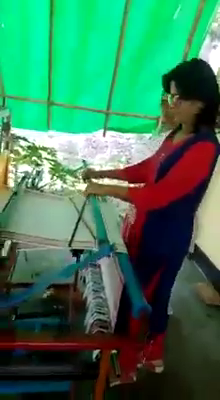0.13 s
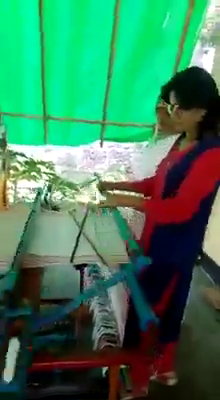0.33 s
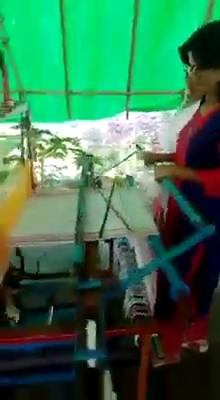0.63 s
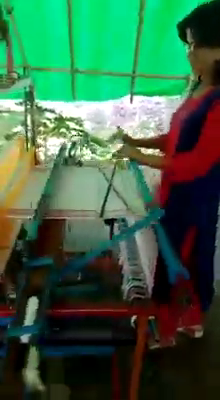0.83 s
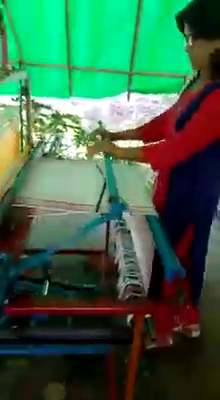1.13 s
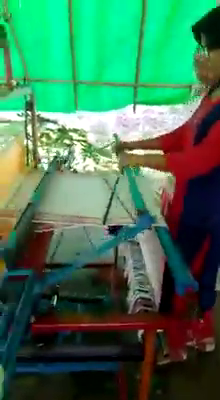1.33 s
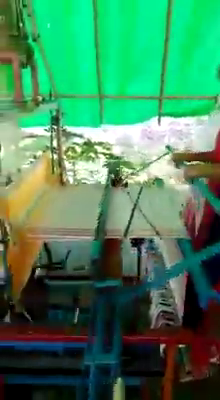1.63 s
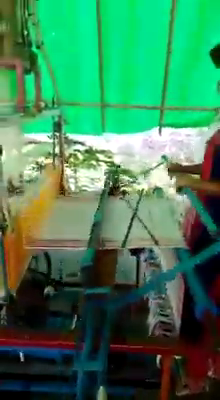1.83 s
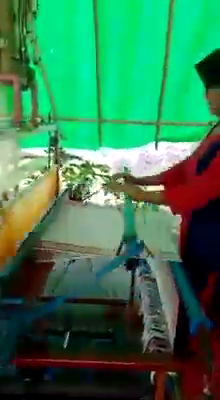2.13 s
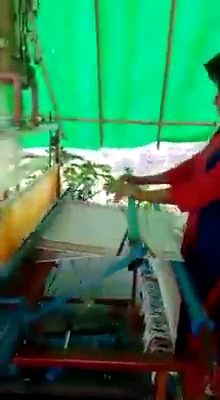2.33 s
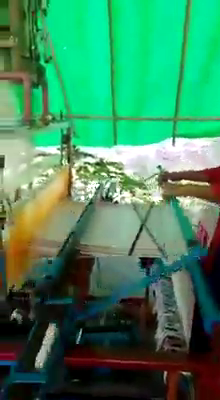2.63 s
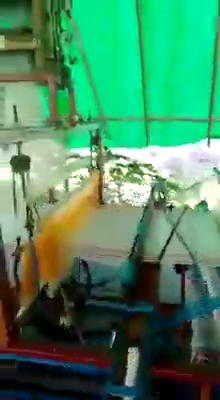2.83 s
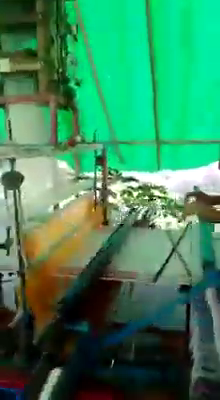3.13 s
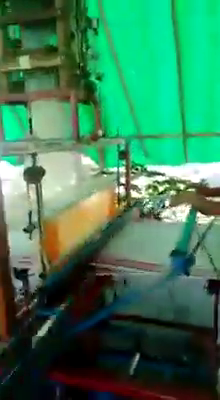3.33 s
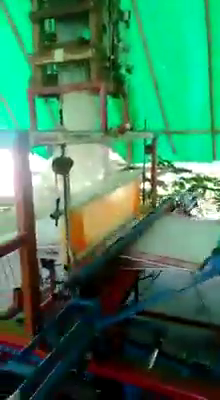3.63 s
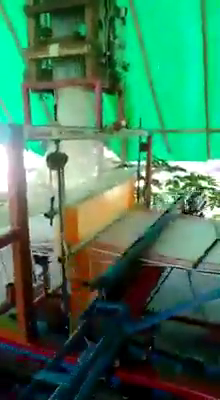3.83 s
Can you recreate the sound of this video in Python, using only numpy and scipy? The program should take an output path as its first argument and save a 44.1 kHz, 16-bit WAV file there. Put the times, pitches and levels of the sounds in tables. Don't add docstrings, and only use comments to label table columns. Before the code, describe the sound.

Hand loom rattling in bursts, bright metallic jingle over woody clatter, single clacks between strokes, densest again near the end; short covered-yard echo, quiet background, close stereo handheld microphone with slightly gritty, gated sound.

```python
import sys
import numpy as np
from scipy import signal
from scipy.fft import rfft, irfft
from scipy.io import wavfile
from scipy.ndimage import uniform_filter1d

SR = 44100
rng = np.random.default_rng(int(sys.argv[2]) if len(sys.argv) > 2 else 0)


def to_wav(sig):
    pcm = np.clip(np.atleast_2d(sig), -1, 1) * 32767
    pcm = np.round(pcm).astype(np.int16)
    wavfile.write(sys.argv[1], SR, pcm.T)


def ratio_of_db(decibels):
    return 10 ** (np.asarray(decibels, float) / 20)


N = 176400

ROD_PITCHES = [14815, 14815, 12188, 13313]


def evened(x):
    return x / np.sqrt(np.mean(x ** 2) + 1e-20)


def read(points, hz):
    f, value = np.transpose(points)
    return np.interp(np.log(hz + 1), np.log(f + 1), value)


def shape(start, rise, hold, t60):
    t = np.arange(0, N, 8) / SR - start
    attack = np.clip(t / rise, 0, 1) ** 2
    release = ratio_of_db(-120 * np.clip(t - rise - hold, 0, 3) / t60)
    return np.repeat(attack * release, 8)[:N]


def ports(pair, points):
    # pitch in Hz, share in common from 0 to 1.
    likeness = [(60, 1), (500, 0.66), (3000, 0.28), (15000, 0.07)]
    # pitch in Hz, left minus right in dB.
    balance = [(60, -2), (240, 0.5), (950, 0.5), (3770, -1.0), (15000, 1.5)]
    hz = np.fft.rfftfreq(N, 1 / SR)
    below = np.maximum(np.log2(points[0][0] / (hz + 1)), 0)
    above = np.maximum(np.log2((hz + 1) / points[-1][0]), 0)
    a, b = rfft(pair) * ratio_of_db(read(points, hz) - 60 * (below + above))
    same = np.clip(read(likeness, hz), 0, 1)
    lean = ratio_of_db(read(balance, hz) / 2)
    left = a * lean
    right = (same * a + np.sqrt(1 - same ** 2) * b) / lean
    return evened(irfft(np.array([left, right]), N))


def wander(width_hz):
    r = np.exp(-np.pi * width_hz / SR)
    noise = rng.standard_normal((2, N, 2)) @ [1, 1j]
    a, b = signal.lfilter([1], [1, -2 * r, r * r], noise)
    return np.array([a, 0.84 * a + 0.5 * b])


def fuzzy(hz, slow):
    moved = np.roll(slow, rng.integers(N), axis=1)
    return evened((moved * np.exp(2j * np.pi * hz * np.arange(N) / SR)).real)


def smooth(grid, bins, frames):
    return uniform_filter1d(uniform_filter1d(grid, bins, axis=0), frames, axis=1)


def rattle(points, per_s, spread_db, ring_s):
    size = ratio_of_db(spread_db * np.minimum(rng.exponential(1, (2, N)), 4))
    size = size * (rng.random((2, N)) < per_s / SR)
    piece = rng.integers(0, 12, (2, N))
    t = np.arange(2048) / SR
    out = np.zeros((2, N))
    for k, noise in enumerate(rng.standard_normal((12, 2048))):
        longer = 0.21 + k / 8
        ring = noise * ratio_of_db(-60 * t / (ring_s * longer)) / np.sqrt(longer)
        out += signal.oaconvolve(size * (piece == k), ring[None], axes=1)[:, :N]
    lump_s, lump_db = 0.012, -0.62
    lumps = uniform_filter1d(rng.standard_normal(N // 64 + 1), int(lump_s * SR / 64))
    return ports(out, points) * ratio_of_db(lump_db * np.repeat(evened(lumps), 64)[:N])


def loom():
    # start in seconds, hold in seconds, level of wires, plates and frame in dB.
    strokes = [(-.01, 0.046, -20, -37.5, -72), (0.016, 0.06, -19.5, -32.5, -50),
               (0.119, 0.12, -17, -26.5, -34), (0.292, 0.11, -17, -29, -40), (0.467, 0.082, -32, -33, -56),
               (1.161, 0.14, -21, -27.5, -55), (1.316, 0.1, -15, -22, -31),
               (1.475, 0.086, -29.5, -40, -45.5), (1.725, 0.041, -37.5, -73, -73),
               (1.947, 0.069, -53.5, -72, -69.5), (2.234, 0.018, -28.5, -42, -61),
               (2.262, 0.069, -24, -39.5, -77), (2.343, 0.081, -15.5, -28.5, -38),
               (2.45, 0.17, -17.5, -26, -29.5), (2.849, 0.022, -33, -38, -43),
               (3.086, 0.031, -41.5, -53, -66), (3.241, 0.032, -45, -72, -80), (3.328, 0.11, -26, -48, -85),
               (3.399, 0.12, -17.5, -25, -44), (3.47, 0.16, -21.5, -32.5, -35),
               (3.644, 0.098, -16, -25, -29), (3.795, 0.072, -25.5, -33, -61)]
    # start in seconds, wires in dB, plates above wires in dB, fade t60 in seconds.
    clacks = [(0.618, -21, -26, 0.27), (0.873, -40, -13.5, 0.16), (1.081, -49, -12, 0.17),
              (1.131, -43, -20, 0.2), (1.191, -17.5, -17.5, 0.37), (2.1331, -45.5, -25.5, 0.12),
              (2.5044, -19.5, -53, 0.54), (2.7134, -16, -9.5, 0.37), (2.9268, -19, -15.5, 0.11),
              (2.964, -22.5, -17.5, 0.14), (3.3034, -28.5, -51, 0.44), (3.7074, -20, -16, 0.1),
              (0.147, -23, -12, 0.23), (0.171, -16, -11, .12), (0.317, -21, -20, 0.17),
              (1.054, -48, -14, 0.093), (1.329, -18.5, -9.5, .2), (1.413, -28, -18, .15),
              (1.557, -20, -11.5, 0.3), (1.748, -34.5, -8.5, 0.13), (2.004, -55, -16, 0.11),
              (2.374, -32, -9, .15), (2.4, -16.5, -8.5, 0.18), (3.423, -16.5, -28, 0.18),
              (3.6565, -17.5, -4, 0.24), (3.816, -18.5, -19, 0.092), (3.833, -27, -9, 0.073),
              (3.889, -28, -1.5, 0.17)]
    # pitch in Hz, level in dB.
    wires = [(4700, -6.5), (5900, -6), (7100, 1), (8150, -2.5), (10500, 6), (12500, 0), (15300, -4.5)]
    # pitch in Hz, level in dB.
    plates = [(1030, -19.5), (1750, -12.5), (2150, 0.5), (2830, 1.5), (3970, -0.5), (4490, 2.5),
              (4700, -0.5), (6110, -10), (10300, -120)]
    # pitch in Hz, level in dB.
    frame = [(24, -47), (40, -5), (91, -18.5), (230, -15.5), (422, 2), (1010, 5), (1120, -1), (1240, 5.5),
             (1750, 2), (2280, -12), (3850, -120)]
    # knocks per second, size spread in dB, ring of a knock in seconds,
    # fade t60 after a stroke in seconds.
    parts = [
        (4830, 3.43, 0.0046, 0.38),
        (2912, 2.4, 0.0059, 0.71),
        (1189, 4.57, 0.042, 0.17),
    ]
    out = np.zeros((2, N))
    for k, (points, part) in enumerate(zip((wires, plates, frame), parts)):
        per_s, spread_db, ring_s, t60 = part
        power = np.zeros(N)
        for row in strokes:
            power += ratio_of_db(2 * row[2 + k]) * shape(row[0], 0.027, row[1], t60)
        for start, db, plates_db, fade in clacks:
            part_db = db + (0, plates_db, plates_db - 10)[k]
            power += ratio_of_db(2 * part_db) * shape(start, 0.002, 0.0068, fade)
        out += np.sqrt(power) * rattle(points, per_s, spread_db, ring_s)
    return out


def creaks():
    # start in seconds, length in seconds, pitch in Hz, level in dB.
    slips = [(0.535, 0.089, 524, -48.5), (0.775, 0.079, 315, -59), (0.811, 0.15, 1160, -57),
             (0.828, 0.088, 920, -58), (1.017, 0.074, 324, -58.5), (1.067, 0.14, 826, -50),
             (1.076, 0.35, 1685, -51), (1.541, 0.087, 663.2, -35.5), (1.556, 0.069, 479.6, -41.5),
             (1.857, 0.044, 1166, -53.5), (.0, 0.093, 789, -37.5), (.0, 0.14, 450.4, -45.5),
             (2.07, 0.051, 1304, -65.5), (2.232, 0.14, 698, -58), (2.235, 0.027, 1376, -49),
             (2.227, 0.035, 1640, -57.5), (3.897, 0.042, 460.3, -38.5), (3.912, .09, 675, -40)]
    slow = wander(72.6)
    return sum(ratio_of_db(db) * np.sqrt(shape(start, 0.0097, length, 0.2)) * fuzzy(hz, slow)
               for start, length, hz, db in slips)


def bumps():
    # start in seconds, level in dB, pitch in Hz, fade t60 in seconds.
    thumps = [
        (0.047, -50.5, 70.2, 0.46),
        (3.3, -66.5, 130, 0.22),
        (.33, -46, 120, 0.36),
        (1.192, -55.5, 103, 0.82),
        (1.347, -37, 94.3, 0.19),
        (2.4, -39, 115, 0.43),
        (2.494, -40, 95.8, 0.34),
        (3.43, -45.5, 118, 0.74),
        (3.669, -39, 110.8, 0.12),
    ]
    # start in seconds, level in dB, pitch in Hz, fade t60 in seconds.
    beam = [
        (2.39, -46, 260, .3),
        (2.5, -47, 270, .3),
        (3.68, -45, 240, .3),
        (3.77, -47, 310, .3),
        (1.35, -47, 200, .2),
        (3.5, -49, 330, .2),
    ]
    slow = wander(75)
    return sum(ratio_of_db(db) * np.sqrt(shape(start, 0.0039, 0.025, t60)) * fuzzy(hz, slow)
               for start, db, hz, t60 in thumps + beam)


def shakes():
    # start in seconds, length in seconds, pitch in Hz, width in Hz, level in dB.
    shivers = [
        (3.3, 0.16, 10900, 730, -28.5),
        (3.255, 0.13, 3600, 980, -45.5),
        (2.72, 0.23, 2900, 1500, -39),
        (0.15, 0.102, 1270, 64, -38),
        (2.8, 0.055, 900, 360, -42),
    ]
    return sum(ratio_of_db(db) * np.sqrt(shape(start, 0.011, length, 0.2)) * fuzzy(hz, wander(width))
               for start, length, hz, width, db in shivers)


def pulley():
    # start in seconds, length in seconds, pitch in Hz, level in dB.
    squeaks = [
        (1.875, 0.07, 7600, -61.5),
        (1.995, 0.021, 7100, -47.5),
        (2.035, 0.07, 7550, -51),
        (2.03, 0.051, 14000, -65),
        (3.2, .08, 18000, -60),
    ]
    slow = wander(450)
    return sum(ratio_of_db(db) * np.sqrt(shape(start, 0.007, length, 0.086)) * fuzzy(hz, slow)
               for start, length, hz, db in squeaks)


def rods():
    # start in seconds, hold in seconds, fade t60 in seconds.
    rings = [
        (.03, .22, .3),
        (2.4, .2, 1.9),
        (3.69, .12, .6),
        (3.7, .12, .6),
    ]
    levels = [-38, -38, -29, -34]
    t = np.arange(N) / SR
    out = np.zeros((2, N))
    for (start, hold, t60), hz, db in zip(rings, ROD_PITCHES, levels):
        turns = hz * t + rng.random((2, 1)) * 0.24
        out += np.sqrt(2 * shape(start, 0.0051, hold, t60)) * ratio_of_db(db) * np.sin(2 * np.pi * turns)
    return out


def shelter(x):
    t60 = 0.52
    taps = rng.choice([-1., 1.], (2, SR)) * (rng.random((2, SR)) < 0.05)
    taps = taps * ratio_of_db(-60 * np.arange(SR) / SR / t60)
    taps = signal.lfilter([1], [1, -0.4], taps)
    return signal.fftconvolve(x, taps / np.linalg.norm(taps[0]), axes=1)[:, :N]


def yard():
    # pitch in Hz, level in dB.
    colour = [(30, -5.5), (60, -16), (200, -27), (1190, -25), (5450, -43), (6050, -15), (12600, -11.5),
              (15400, -27)]
    return ratio_of_db(-54) * ports(rng.standard_normal((2, N)), colour)


def scene():
    near = loom() + creaks() + bumps() + shakes() + pulley()
    return near + ratio_of_db(-5.5) * shelter(near) + rods() + yard()


def colouring(z, hz):
    # pitch in Hz, width in Hz, depth in dB.
    hollows = [
        (258, 80, 1),
        (799, 94, 8),
        (1784, 33, 29),
        (4647, 420, 4.5),
        (5500, 180, 0),
        (11940, 120, 5),
        (8070, 195, 0.5),
        (2134, 57, 4.5),
        (12800, 130, 7),
    ]
    colour_db = -sum(db * np.exp(-((hz - f) / width) ** 2) for f, width, db in hollows)
    colour_db = colour_db - 24 * np.maximum(np.log2(49.5 / (hz + 1)), 0)
    colour_db = colour_db - 60 * np.clip((hz - 15500) / 300, 0, 1)
    comb_db = 4 * np.sin(2 * np.pi * hz * 0.00064) * (hz > 13000) * np.array([[1], [-1]])
    patches = evened(smooth(rng.standard_normal(z.shape[1:]), 6, 16))
    patch_db = 3 * np.clip(hz / 250, 0, 1) * np.clip(1200 / (hz + 1), 1, 1.2)
    return z * ratio_of_db((colour_db + comb_db)[:, :, None] + patches * patch_db[:, None])


def gate(z, hz):
    # pitch in Hz, level relative to the neighbours in dB.
    threshold = [(120, -30), (250, -19), (1000, -17), (1700, -12), (3300, -12), (3950, -1), (5600, -1),
                 (6400, -10), (8000, -7), (9200, -11), (11500, -9), (14500, -4)]
    power = (abs(z) ** 2).mean(0)

    def level(bins):
        return 10 * np.log10(abs(smooth(power, bins, 4)) + 1e-16)

    streaks = evened(smooth(rng.standard_normal(z.shape[1:]), 5, 10))
    mask_db = level(140) + read(threshold, hz)[:, None] + 4 * streaks
    quiet = np.clip((-25.5 - 10 * np.log10(power.sum(0) + 1e-16)) / 20, 0, 1)
    mask_db = mask_db + 4 * quiet * (hz > 1400)[:, None]
    near_rod = abs(hz[:, None] - ROD_PITCHES).min(1) < 45
    rod = (level(3) > level(60) + 5.5) * near_rod[:, None] * 1.
    around = uniform_filter1d(rod, 56, axis=0) > 1e-3
    beside = uniform_filter1d(rod, 3, axis=0) < 1e-3
    z = z * ratio_of_db(-28 * (around & beside))
    return z * ratio_of_db(-45 * np.clip((mask_db - level(3)) / 2, 0, 1))


def overload_and_thin(x):
    hz, _, z = signal.stft(np.tanh(x), SR, nperseg=2048, noverlap=1536)
    z = gate(colouring(z, hz), hz)
    return signal.istft(z, SR, nperseg=2048, noverlap=1536)[1][:, :N]


def low_pass(x):
    return signal.sosfilt(signal.butter(12, 16490, fs=SR, output="sos"), x)


def record(dry):
    mix = overload_and_thin(dry)
    return low_pass(mix)


dry = scene()
out = record(dry)
to_wav(out)
```